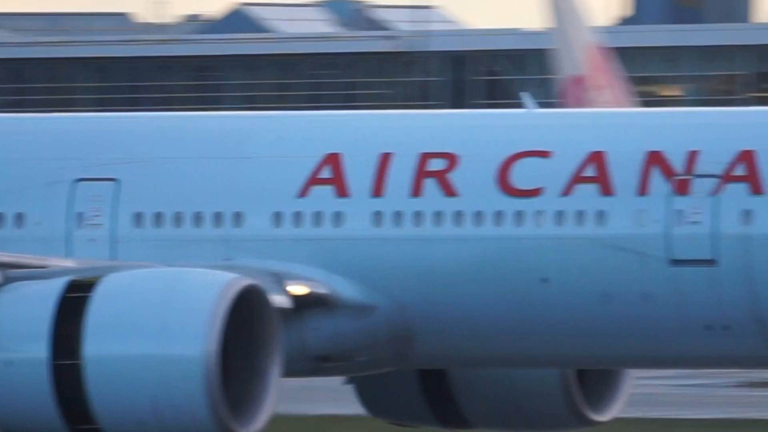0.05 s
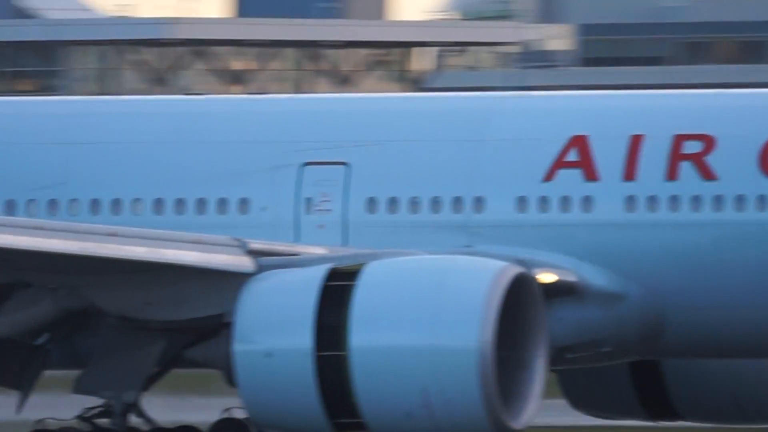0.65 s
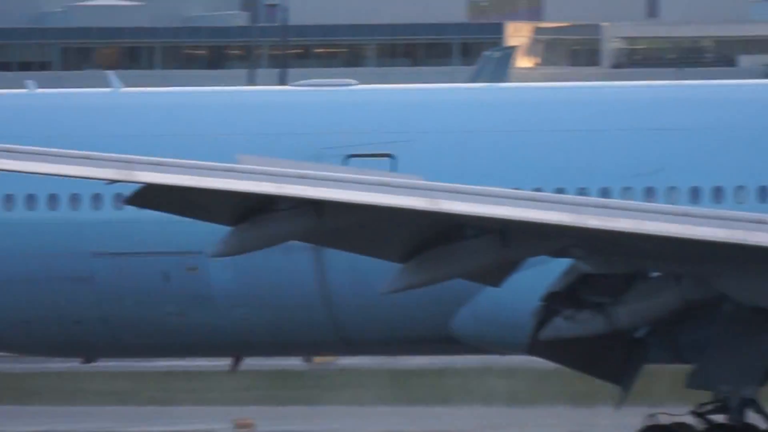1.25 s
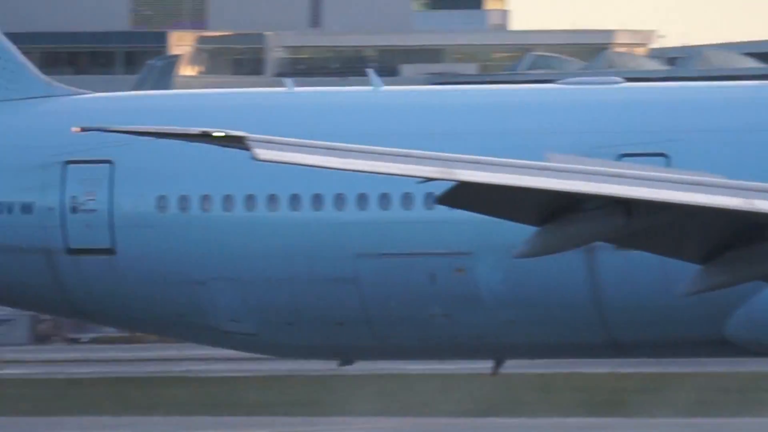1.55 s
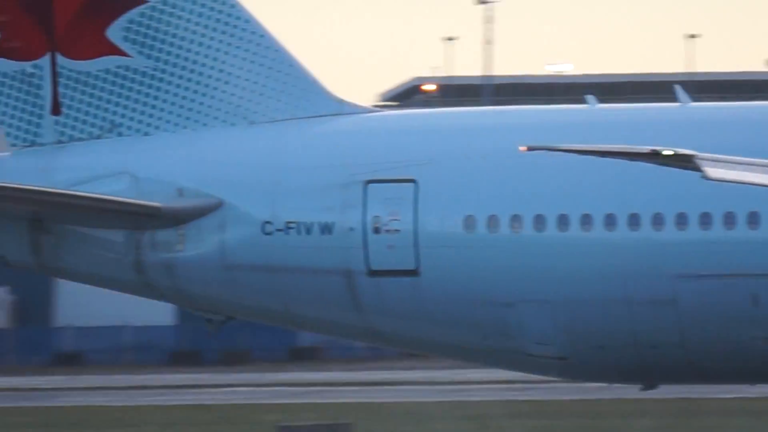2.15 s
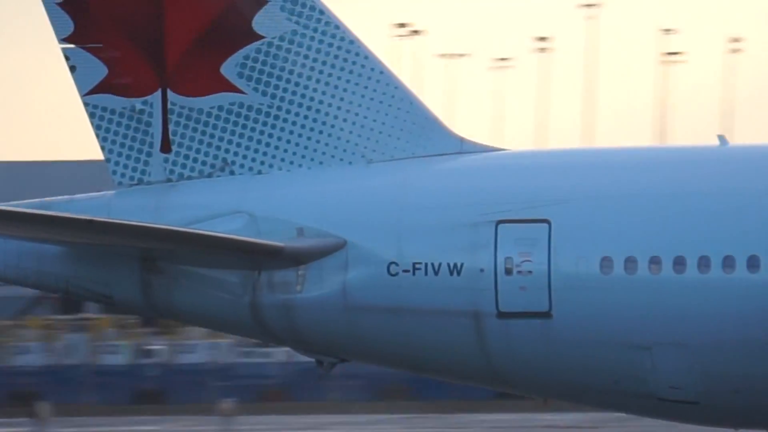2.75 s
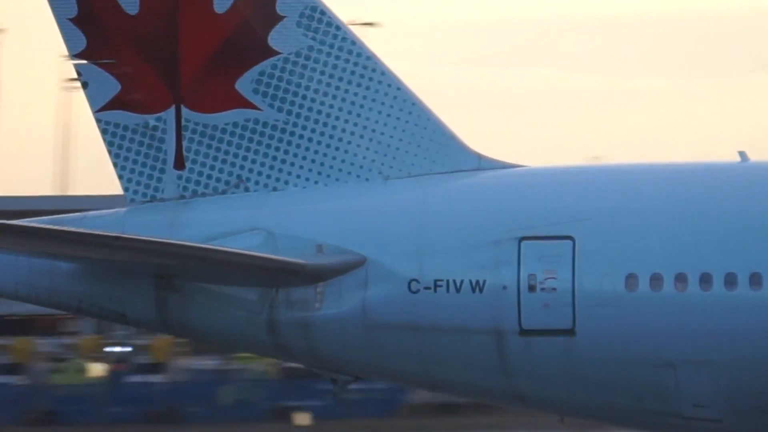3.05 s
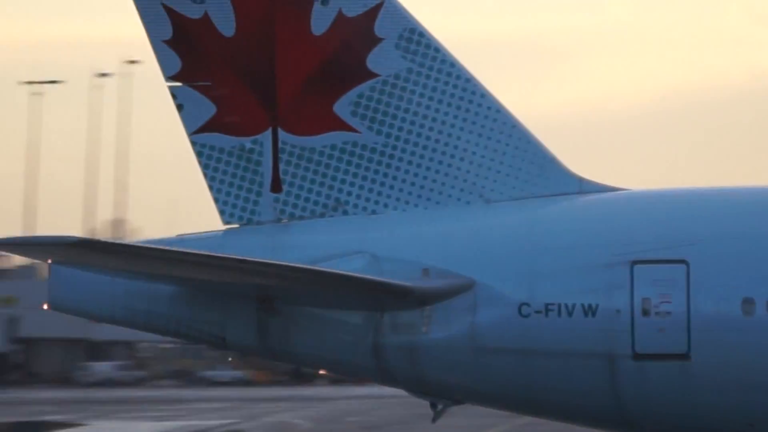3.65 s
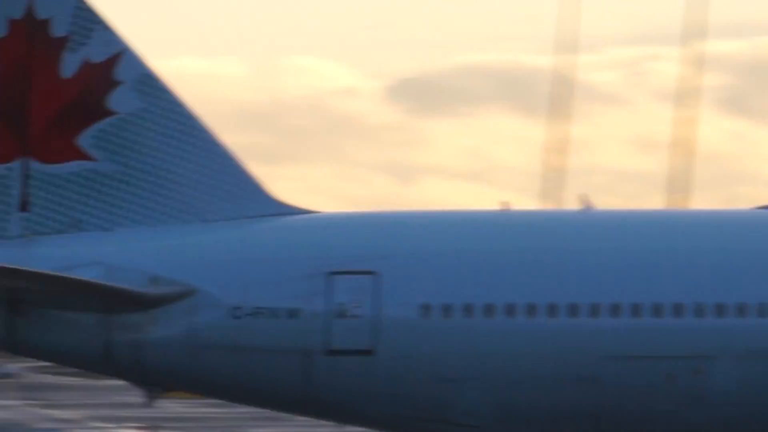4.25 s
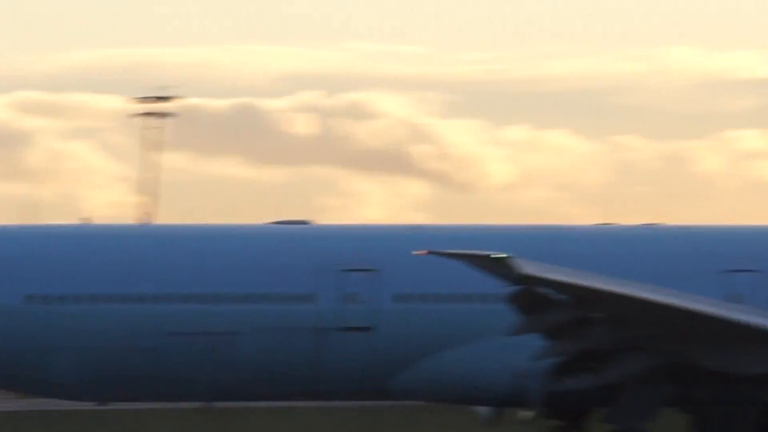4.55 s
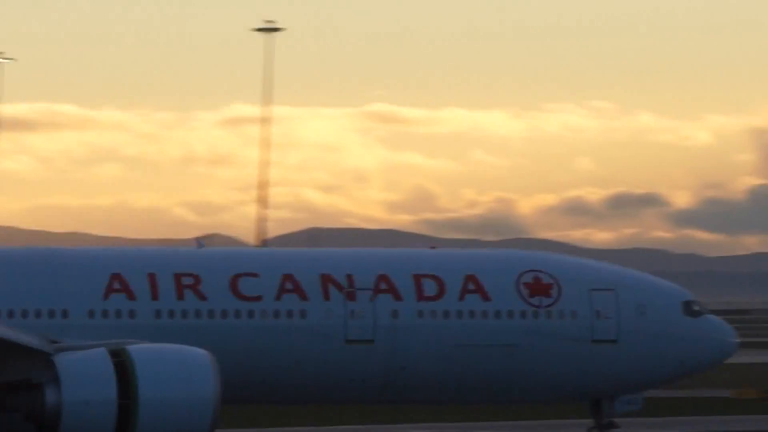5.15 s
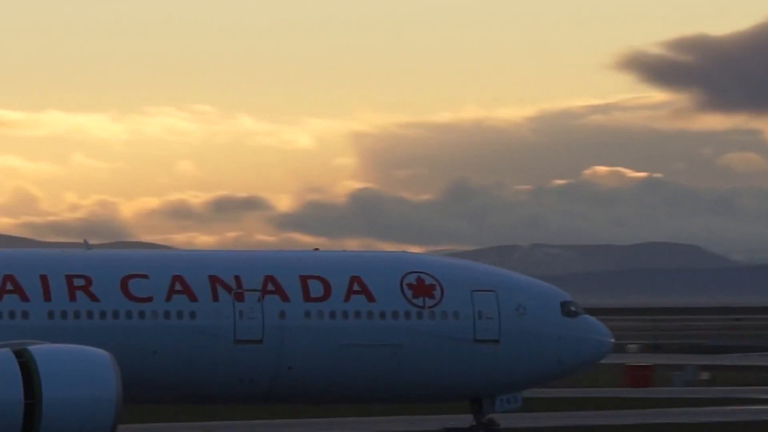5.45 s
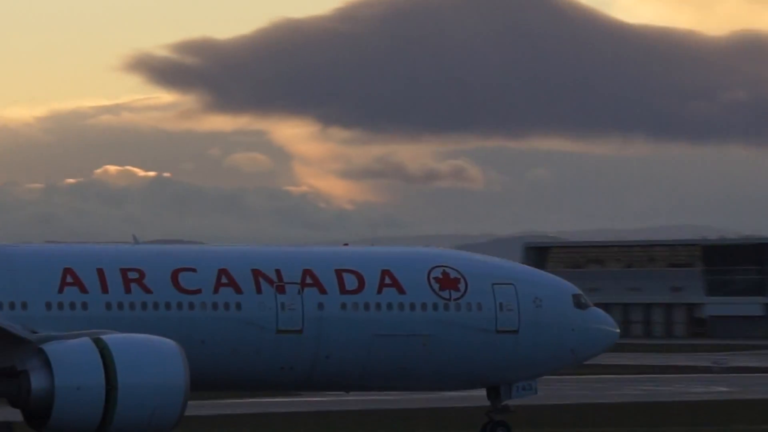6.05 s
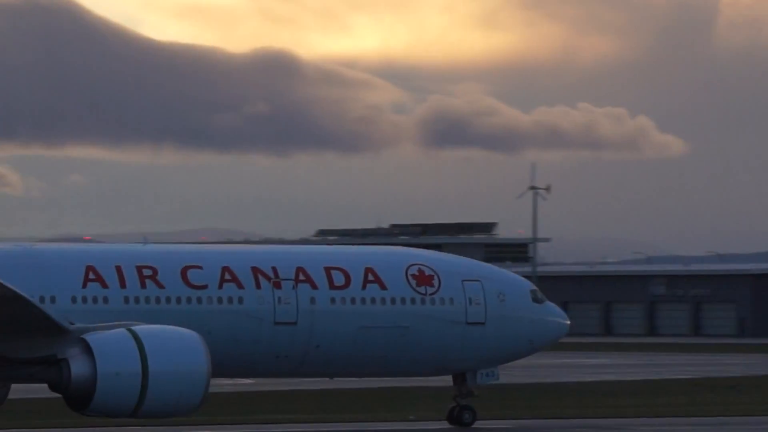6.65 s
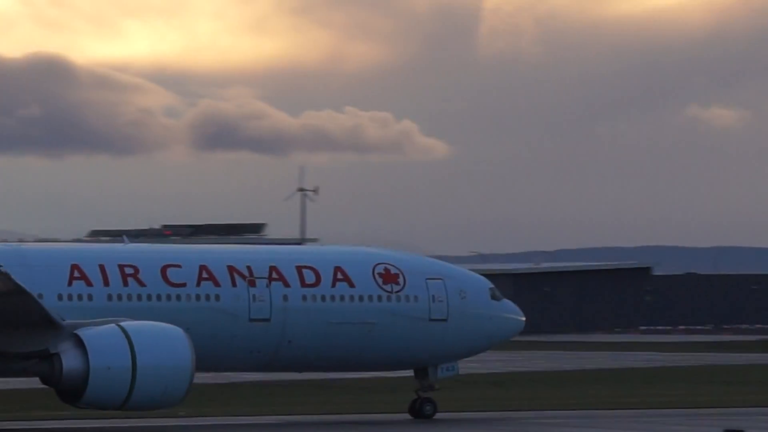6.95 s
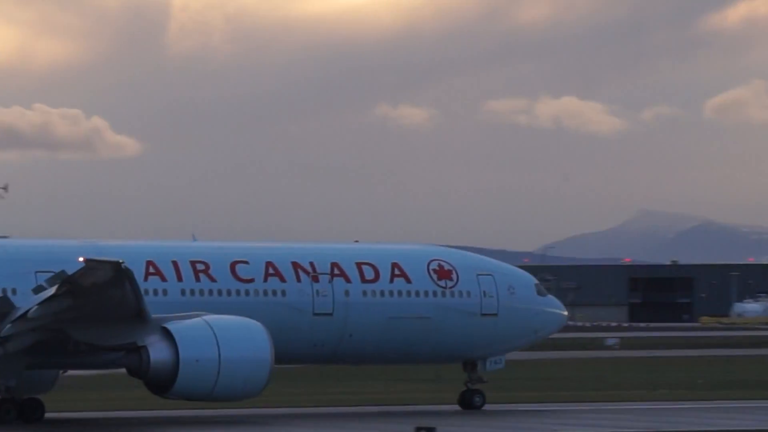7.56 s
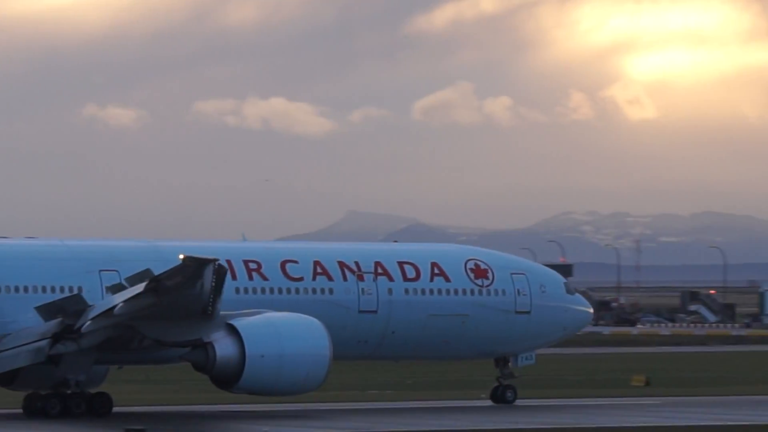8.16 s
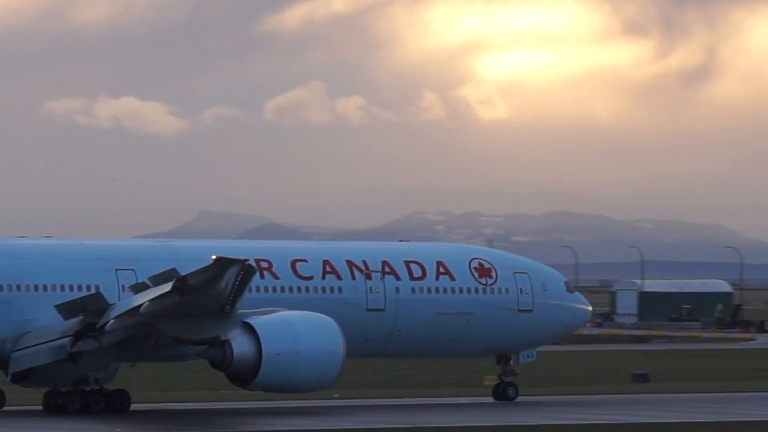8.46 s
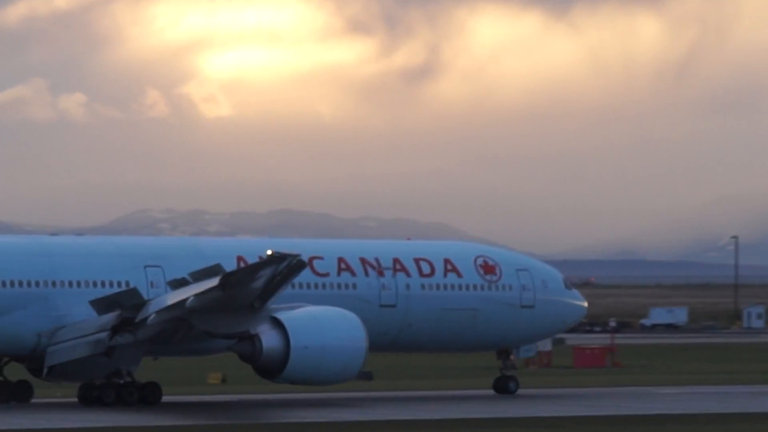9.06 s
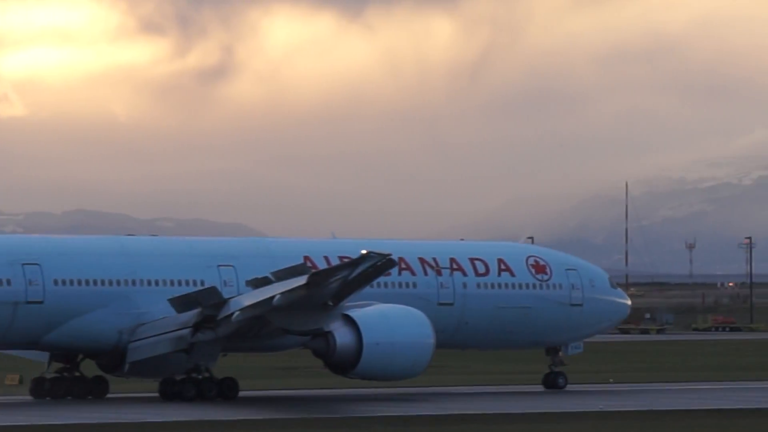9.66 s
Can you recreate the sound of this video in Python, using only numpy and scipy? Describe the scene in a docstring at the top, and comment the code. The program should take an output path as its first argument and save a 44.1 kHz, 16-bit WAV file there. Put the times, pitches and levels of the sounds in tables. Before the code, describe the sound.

A large jet airliner rolls past on an airport runway with a loud, continuous reverse-thrust roar. Faint fan tones fall in pitch as it passes, and the rushing noise wavers in the air. About four seconds in, a camera's zoom lever ticks close to the microphone and its motor hisses faintly. The roar then eases steadily as the engines wind down and the plane moves away.

```python
"""Jet rolling past in reverse thrust

A large jet passes on the runway, then recedes as its engines spool down and the reversers close.
Its mixing noise flutters in moving air; ground echoes carve notches that sink, then slowly rise.
Fan tones fall with Doppler shift and rotor speed, and flare briefly; the exhaust rasps once, late.
Midway, a camera's zoom lever ticks and its motor hisses faintly; a soft rustle follows near 6 s."""
import sys
import numpy as np
from scipy import signal
from scipy.fft import rfft, irfft, next_fast_len
from scipy.io import wavfile

SR = 44100
rng = np.random.default_rng(int(sys.argv[2]) if len(sys.argv) > 2 else 0)


def transcribe(u):
    """Save the signal u as a 16-bit wav file named by the first command-line argument.

    u: samples, shape (n,) or (channels, n), limited to [-1, 1]; the rate is SR.
    q: integer samples, one column per channel.
    """
    v = np.clip(np.atleast_2d(u).T, -1, 1)
    q = np.round(v * 32767).astype(np.int16)
    wavfile.write(sys.argv[1], SR, q)


N = 437472
SIZE, HOP = 2048, 256
HZ = np.fft.rfftfreq(SIZE, 1 / SR)
FRAME_S = np.arange(int(np.ceil(N / HOP)) + 1) * HOP / SR
SPOOL_DOWN_S = 5.7

# rumble, plume, roar, hiss: (low [Hz], high [Hz], starting level [dB], drift under power [dB/s],
# drift in spool-down [dB/s], step as the reversers close [dB])
JET_BANDS = [(40, 149, -53.5, -0.76, .5, -8), (199, 550, -28, -0.9, -3.5, 2.5),
             (596, 1990, -20.5, -0.1951, -3.5, -3.5), (2366, 4300, -32, 0.4974, -3.5, -3.5)]
# ground-echo ridges and notches behind the jet: (centre [Hz], width [Hz], gain [dB])
GROUND_ECHO = [(128, 13, -5.5), (176, 14, 3.5), (243, 19, -3), (390, 18, -2.5), (425, 24, 1.5),
               (520, 22, 2), (568, 32, -1), (810, 110, 1.1), (1083, 76, -2.5), (1292, 60, 3),
               (1440, 74, 3.5), (1723, 152, -8), (1967, 150, 3.6), (2272, 69, -6.5), (2700, 170, 5.5),
               (3000, 120, -1.5), (3420, 180, 4.5), (4000, 83, -5.5), (4600, 530, 0.5), (5130, 140, -5.5),
               (5600, 250, 0), (6150, 140, -11), (6500, 240, -2), (7070, 240, -8), (7600, 200, 2.5)]


def gain_of(db):
    """Decibels to amplitude."""
    return 10 ** (np.asarray(db) / 20)


def unit_rms(x):
    """Scale to rms 1."""
    return x / np.sqrt(np.mean(x ** 2) + 1e-20)


def ease(t, middle_s, half_s):
    """Smooth step from 0 to 1."""
    return .5 + .5 * np.tanh((t - middle_s) / half_s)


def per_bin(points):
    """Interpolate (frequency, value) points on a log-frequency axis."""
    hz, value = np.transpose(points)
    return np.interp(np.log(HZ + 1), np.log(hz + 1), value)


def per_frame(rows):
    """Interpolate each column of (time, values...) rows."""
    times_s, *columns = np.transpose(rows)
    return [np.interp(FRAME_S, times_s, column)[:, None] for column in columns]


def ridges(rows, shift=1):
    """Bell-shaped ridges and notches in dB, frequencies scaled by shift."""
    shape_db = sum(db * np.exp(-((HZ - hz) / width_hz) ** 2) for hz, width_hz, db in rows)
    return np.interp(HZ / shift, HZ, shape_db)


def noise_spectra():
    """Short-time spectra of white noise, frames x bins."""
    return signal.stft(rng.standard_normal(N), nperseg=SIZE, noverlap=SIZE - HOP)[2].T


def spooling_s(t):
    """Time since the engines were throttled back."""
    return np.maximum(t - SPOOL_DOWN_S, 0)


def doppler(t, speed_m_per_s=40.2, closest_s=1.84, distance_m=74.6, sound_m_per_s=343):
    """Pitch factor of a source passing in a straight line."""
    along_m = speed_m_per_s * (t - closest_s)
    return 1 / (1 + speed_m_per_s / sound_m_per_s * along_m / np.hypot(along_m, distance_m))


def band_levels_db(t):
    """Jet band levels: slow drift, spool-down, reversers closing; gusts sway the upper two."""
    # (time [s], length [s], roar gain [dB], hiss gain [dB])
    gusts = [(.52, 0.088, -1, -1.5), (0.77, 0.08, 1.5, -0.5), (0.958, .05, -2.5, 0.5),
             (1.45, 0.15, -1, 1.4), (2.367, 0.088, 0, 1), (2.788, 0.053, -1.5, -2.2),
             (3.15, 0.082, -1, 1.5), (3.5, 0.11, 0.5, 2), (4.19, 0.062, 0.5, 1), (4.5, 0.18, -1.5, -1.5),
             (5.0, 0.3, 0.3, 1), (5.545, 0.07, -2.5, -0.8), (5.86, 0.048, -1, -1.5), (6.113, 0.11, 0, 1.4),
             (6.4, .06, 2.5, 0.5), (6.637, 0.13, -3, 0), (6.86, 0.31, 1.2, 3.5), (7.416, 0.1, 3, 1),
             (7.8, 0.17, 0, -1), (8.15, 0.065, -3, -2.5), (8.36, 0.09, 0, 1.5), (8.89, 0.31, 0.3, 2.5),
             (9.013, 0.044, 4.5, -1), (9.13, 0.17, -2.5, -2), (9.412, 0.077, -1.2, 3),
             (9.75, 0.23, -0.5, -1)]
    stowed = ease(t, middle_s=7.18, half_s=.32)
    rumble, plume, roar, hiss = (
        db + drift * np.minimum(t, SPOOL_DOWN_S) + spool_drift * spooling_s(t) + step_db * stowed
        for _, _, db, drift, spool_drift, step_db in JET_BANDS)
    for at_s, length_s, roar_db, hiss_db in gusts:
        bell = np.exp(-((t - at_s) / length_s) ** 2)
        roar, hiss = roar + roar_db * bell, hiss + hiss_db * bell
    return rumble, plume, roar, hiss


def levelled(colour_db, targets_db):
    """Bend a spectrum smoothly toward a target level in each jet band."""
    power = gain_of(colour_db) ** 2 / len(HZ)
    centres_hz = [np.sqrt(low * high) for low, high, *_ in JET_BANDS]
    for (low, high, *_), target_db, share in zip(JET_BANDS, targets_db, np.eye(len(JET_BANDS))):
        band_db = 10 * np.log10(power[:, (HZ >= low) & (HZ < high)].sum(1, keepdims=True))
        colour_db = colour_db + (target_db - band_db) * per_bin(list(zip(centres_hz, share)))
    return colour_db


def directivity_db(t, turn_away_s=0.93, step_s=4.36):
    """Jet colour as the angle of view moves from abeam to behind to far off."""
    # spectrum at each view: (frequency [Hz], relative density [dB])
    abeam = [(20, -71.5), (42, -44.5), (78, -19.5), (125, -33), (200, -18), (290, -9.5), (430, -2),
             (1050, -4), (1900, -10), (2900, -14.5), (3500, -17.5), (5000, -30.5), (6500, -47),
             (7600, -67.5), (9000, -80)]
    behind = [(20, -63.5), (42, -41.5), (75, -24), (115, -24), (155, -14.5), (205, -18), (270, -6),
              (400, -0.5), (1100, 1), (2600, -11.5), (3700, -18.5), (5300, -24.5), (6500, -36), (8000, -53),
              (9500, -76.5)]
    far = [(20, -57), (42, -40.5), (90, -19.5), (132, -23), (200, -10), (310, -2), (450, -3.5), (750, -1.5),
           (1450, -4.5), (2700, -12), (4800, -21), (6400, -35), (7300, -53), (9000, -75)]
    view = np.clip((t - turn_away_s) / step_s, 0, 2)
    return sum(np.maximum(1 - abs(view - k), 0) * per_bin(colour)
               for k, colour in enumerate([abeam, behind, far]))


def ripple_db(t, fan_doppler_share=0.44, early_echo=0.08):
    """Fan bands and near reflections abeam; behind the jet the grazing ground echo takes over."""
    # at closest approach: (centre [Hz], width [Hz], gain [dB])
    fan_bands = [(421, 38, 0), (475, 28, 0), (890, 85, 1), (1034, 51, 2), (1230, 110, -4), (1555, 120, 3),
                 (1805, 263, -3), (2870, 130, 5), (3630, 85, 0.5), (4280, 110, 3.5)]
    roar_hollow = [(643, 75, -3.5)]
    reflections = [(126, 16, -2), (3290, 150, -5.5), (3750, 92, 0.5), (4020, 130, -3.5), (5330, 110, -1.5),
                   (5700, 150, 2.5), (6030, 130, 0.5), (6570, 220, 1), (6980, 140, -3.5), (7330, 150, 4)]
    # echo notches sink, then climb as the path flattens: (time [s], frequency factor)
    notch_slide = [(4.7, 0.97), (5.5, 0.97), (6.4, 0.95), (7.5, 0.974), (9.92, 1.003)]
    echo = early_echo + (1 - early_echo) * ease(t, middle_s=4.84, half_s=0.76)
    fan_db = ridges(fan_bands, doppler(t) ** fan_doppler_share) + ridges(roar_hollow, doppler(t))
    ground_db = ridges(GROUND_ECHO, per_frame(notch_slide)[0])
    near_db = (1 - ease(t, middle_s=4.52, half_s=.12)) * ridges(reflections)
    return (1 - echo) * fan_db + echo * ground_db + near_db


def eddies(length_s, width_hz):
    """Moving air: a smooth random time-frequency field of rms 1."""
    white = np.fft.rfft2(rng.standard_normal((len(FRAME_S), 128)))
    rate_hz = np.fft.fftfreq(len(FRAME_S), HOP / SR)[:, None]
    cycles_per_hz = np.fft.rfftfreq(128, HZ[8])
    field = np.fft.irfft2(white / (1 + (rate_hz * length_s) ** 2) / (1 + (cycles_per_hz * width_hz) ** 2))
    return unit_rms(np.repeat(field, 9, axis=1)[:, :len(HZ)])


def port_noise():
    """Turbulent noise at two microphone ports that turn after the jet."""
    # (time [s], turn [0 abeam, 1 aft], extra L-R [dB])
    pan = [(0, .13, 1.8), (1.3, 0.064, 0.6), (3.8, 0.27, -1), (4.25, 0.23, -0.5), (5.2, 0.95, 0.4),
           (9.92, 0.89, 0)]
    # (frequency [Hz], L-R [dB])
    abeam_balance = [(100, 0.5), (550, -1), (950, 1.5), (1230, -5.5), (1580, 6.5), (1850, -5.5), (2150, 5),
                     (2500, -6.5), (2900, -2.5), (3250, -4.5), (3700, -2), (4400, 1), (6600, 1.5),
                     (7000, -3)]
    aft_balance = [(100, 1), (900, 0.7), (1250, -0.1), (1700, 5.5), (1900, 0.5), (2150, 5), (2550, -1),
                   (2850, -6), (3150, 1.5), (3450, -2.3), (4200, 3.5), (5500, 1.5), (6400, 6.5),
                   (7500, 0.5)]
    # (frequency [Hz], left lead [rad])
    abeam_phase = [(60, -0.093), (300, 0.023), (700, 0.55), (1100, -0.04), (1400, 1.1), (1700, -0.26),
                   (1950, 0.98), (2350, -1.5), (2650, -0.01), (3120, -1.3), (3350, 1.4), (3800, 0.44),
                   (4300, -0.8), (5600, 0.31)]
    aft_phase = [(60, 0.02), (300, 0.14), (750, 0.31), (1100, 0.39), (1500, 0.7), (1950, 0.64),
                 (2200, -0.24), (2700, 0.26), (3000, 1.03), (3250, 0.8), (3650, 0.91), (4800, 0.49),
                 (5400, 0.57), (7000, 0.15)]
    # (frequency [Hz], coherence [0-1])
    coherence = [(100, 1), (500, 0.98), (1000, 0.98), (2000, 0.97), (4000, 0.91), (6500, 0.86),
                 (10000, .75)]
    turn, pan_db = per_frame(pan)
    balance_db = pan_db + (1 - turn) * per_bin(abeam_balance) + turn * per_bin(aft_balance)
    phase_rad = (1 - turn) * per_bin(abeam_phase) + turn * per_bin(aft_phase)
    lean = gain_of(balance_db / 2) * np.exp(.5j * phase_rad)
    mid = noise_spectra() * np.sqrt((1 + per_bin(coherence)) / 2)
    side = noise_spectra() * np.sqrt((1 - per_bin(coherence)) / 2)
    return np.array([(mid + side) * lean, (mid - side) / lean])


def howls_db():
    """Bands of the roar swell or sink: gliding bells in time and frequency."""
    # (time [s], length [s], centre [Hz], glide [Hz/s], width [Hz], gain [dB])
    swells = [(.5, .9, 76, -1, 10, 6.5), (0.858, 0.045, 2930, 0, 130, 5), (1.35, .25, 2790, 1.5, 70, 2),
              (2.3, 0.22, 1492, 1, 70, 3), (2.454, 0.34, 1125, -37, 45, 4.5), (3.15, .064, 3050, 2, 130, 3),
              (3.5, 0.37, 3000, -130, 70, 5), (3.85, .15, 419, -1, 55, 5), (4.9, .25, 58, -4, 18, 8.5),
              (4.9, 0.89, 378, 0, 19, 6), (5.4, 0.19, 904, -1, 75, 5), (5.9, .7, 820, -5, 30, 2),
              (6.2, .4, 416, 1, 18, 3), (6.817, 0.11, 2430, -3, 160, 2.5), (7.5, 0.14, 640, -2, 59, 5.5),
              (8.65, .15, 370, -3, 25, 7.5), (8.7, 1.7, 312, -15, 18, 5), (9.1, .8, 1235, -9.5, 26, 7),
              (8.9, 0.074, 710, 0, 50, 6.5), (9.803, 0.17, 695, 0, 87, 7.5), (.3, .2, 4450, -100, 130, 3),
              (4.5, .35, 455, 0, 40, -2), (7.8, .3, 335, 0, 40, 2.5), (2.85, .3, 205, 0, 25, -3.5),
              (3.55, .25, 228, 0, 30, 2.5), (4.05, .25, 310, 0, 25, 2.5), (4.55, .4, 141, 0, 25, -2.5),
              (5.35, .25, 1300, -60, 110, 2), (6.0, .13, 2700, 0, 450, 1), (6.9, .18, 400, 0, 40, -4),
              (7.2, .5, 145, 0, 33, -4.5), (7.4, .45, 7000, 0, 1200, 3), (7.5, .25, 2180, 1, 120, -6),
              (8.62, .1, 3660, -1, 170, 4), (8.68, .07, 5800, 0, 900, 2), (8.7, .35, 835, 40, 62, -3),
              (9.0, .4, 1090, -150, 76, 3.5), (9.6, .33, 6100, 0, 1000, -4), (9.72, .2, 1720, 0, 70, 5.5),
              (9.7, .35, 3280, 0, 130, -5)]
    out = np.zeros((len(FRAME_S), len(HZ)))
    for at_s, length_s, hz, glide, width_hz, db in swells:
        near = abs(FRAME_S - at_s) < 3 * length_s
        t = FRAME_S[near, None] - at_s
        detuning = (HZ - hz - glide * t) / width_hz
        out[near] += db * np.exp(-(t / length_s) ** 2 - np.minimum(detuning ** 2, 20))
    return out


def aft_lobe_db(t, at_s=3.44, length_s=1.5, centre_hz=214, width_oct=0.98, peak_db=3.0):
    """The plumes beam low roar aft; the lobe sweeps by, rippled by reflections."""
    # (centre before shift [Hz], width [Hz], gain [dB])
    reflections = [(72, 22, -1.5), (140, 35, 2), (190, 20, -6.5), (262, 18, 4), (328, 16, 3),
                   (590, 36, -1.5), (820, 75, 1)]
    lobe_db = peak_db * np.exp(-(np.log2((HZ + 1) / centre_hz) / width_oct) ** 2)
    return np.exp(-((t - at_s) / length_s) ** 2) * (lobe_db + ridges(reflections, shift=0.99))


def jet(broad_flutter_db=0.5, patchy_flutter_db=1.0, air_db_per_s_at_5khz=0.14):
    """Spectra of jet mixing noise; the air flutters and absorbs short waves most."""
    t = FRAME_S[:, None]
    colour_db = levelled(directivity_db(t) + ripple_db(t), band_levels_db(t))
    flutter_db = broad_flutter_db * eddies(length_s=0.045, width_hz=7200)
    flutter_db += patchy_flutter_db * eddies(length_s=0.13, width_hz=540)
    flutter_db *= np.sqrt(HZ / (HZ + 700))
    air_loss_db = air_db_per_s_at_5khz * spooling_s(t) * (HZ / 5000) ** 2
    return port_noise() * gain_of(colour_db + aft_lobe_db(t) + howls_db() - air_loss_db + flutter_db)


def fuzzy_tone(hz, width_hz, roughness=0.4):
    """Tone of rms 1 on a pitch curve, wavering in turbulent air; roughness 0 holds its level steady."""
    offset_hz = np.fft.fftfreq(next_fast_len(len(hz)), 1 / SR)
    spread = rng.standard_normal(len(offset_hz)) + 1j * rng.standard_normal(len(offset_hz))
    waver = np.fft.ifft(spread * np.exp(-(offset_hz / width_hz) ** 2))[:len(hz)]
    phase_rad = np.angle(waver) + 2 * np.pi * np.cumsum(hz) / SR
    return unit_rms(abs(waver) ** roughness * np.cos(phase_rad))


def rotor_tones(slowing_per_s=.045, unmask_db_per_s=0.5):
    """Blades chop intake air: forward-beamed tones that sink as the jet passes and the rotors slow."""
    # (pitch at closest approach [Hz], width [Hz], Doppler share, level ahead [dB re roar],
    # beam lost [s], level behind [dB re roar])
    rotors = [(589, 14, .6, -14.5, 1.5, -25), (470.4, 14, 1, -19.5, 1.9, -20),
              (1089, 36, .58, -10, 2.9, -43), (1554, 27, 1, -22.5, 2.7, -25)]
    t, out = np.arange(N) / SR, np.zeros(N)
    _, _, roar_db, _ = band_levels_db(FRAME_S)
    reference_db = roar_db + unmask_db_per_s * spooling_s(FRAME_S)
    rotor_speed = np.exp(-slowing_per_s * spooling_s(t))
    for closest_hz, width_hz, doppler_share, ahead_db, lost_s, behind_db in rotors:
        beam_db = ahead_db + (behind_db - ahead_db) * ease(FRAME_S, lost_s, half_s=0.2)
        hz = closest_hz * doppler(t) ** doppler_share * rotor_speed
        out += gain_of(np.interp(t, FRAME_S, reference_db + beam_db)) * fuzzy_tone(hz, width_hz)
    return out


def whines():
    """Thin, gliding fan and turbine tones flare briefly out of the roar."""
    # (time [s], length [s], pitch [Hz], glide [Hz/s], width [Hz], level [dB])
    flares = [(0.238, .04, 3010, -1, 40, -41), (.43, .07, 2995, -100, 35, -37),
              (.79, .07, 1122, -40, 18, -33), (.855, .075, 2950, -100, 34, -32.5),
              (.86, .16, 1490, -220, 25, -36), (1.16, .12, 496, -19.5, 9, -32),
              (1.47, 0.065, 442, 0, 10, -32), (1.88, .17, 428, -80, 9, -33),
              (1.584, .12, 2270, 0.5, 30, -39), (2.27, .08, 1450, 0, 15, -33),
              (2.41, .11, 1490, -30, 11, -31), (3.14, .06, 2820, -0.5, 90, -35),
              (3.5, .09, 2700, -0.5, 45, -38), (5.572, 0.045, 1265, -0.5, 16, -29),
              (6.047, 0.18, 1264, -40, 26, -37), (6.35, 0.23, 417.7, 0, 10, -36.5),
              (6.442, .13, 1250, -29.5, 25, -35), (6.748, .05, 1995, 0, 25, -36),
              (6.98, .09, 1980, -60, 20, -40), (7.47, 0.27, 1926, -80, 14, -39.5),
              (7.82, .14, 1225, -0.5, 10, -45), (8.38, .15, 456, 0, 8.7, -40.5),
              (8.85, 0.25, 1496, -24.5, 18, -47), (9.48, .08, 1455, -39.5, 14, -47)]
    out = np.zeros(N + 2 * SR)  # 1 s margin at each end
    t = np.arange(SR) / SR - .5
    for at_s, length_s, hz, glide, width_hz, db in flares:
        envelope = gain_of(db) * np.exp(-(t / length_s) ** 2)
        out[round((at_s + .5) * SR):][:SR] += envelope * fuzzy_tone(hz + glide * t, width_hz)
    return out[SR:SR + N]


def hiss_and_rustle(mid_gain=0.81, side_gain=.45):
    """Spectra of zoom-motor hiss, then a soft rustle near 6 s, over faint microphone self-noise."""
    # (time [s], level [dB])
    motor_then_rustle_level = [(3.2, -100), (3.6, -79), (4.0, -78.5), (4.25, -69), (4.31, -64), (4.5, -61),
                               (4.62, -62.5), (4.68, -70), (4.95, -78), (5.2, -94), (5.95, -88),
                               (6.09, -75), (6.15, -84), (6.4, -82), (6.6, -95)]
    self_noise_level = [(0, -84.5), (3, -80), (7, -76.5), (9.92, -75.5)]
    # (frequency [Hz], relative density [dB])
    treble_colour = [(3000, -17.5), (7000, 2.5), (9500, 1.5), (11000, -5.5), (15000, -7)]
    treble = gain_of(per_frame(motor_then_rustle_level)[0]) * unit_rms(gain_of(per_bin(treble_colour)))
    self_noise = gain_of(per_frame(self_noise_level)[0])
    mid, side = noise_spectra() * mid_gain, noise_spectra() * side_gain
    return np.array([mid + side, mid - side]) * np.hypot(treble, self_noise)


def zoom_lever(right_db=-2, snap_s=0.00072, snap_gain=.35):
    """Plastic ticks carried through the camera body: a snap plus ringing modes; the last, faint one opens the
    soft rustle near 6 s."""
    # (time [s], left peak [dB]); the last row is the faint tick that opens the rustle
    ticks = [(4.1137, -22), (4.1205, -45), (4.309, -36), (6.085, -50)]
    # (frequency [Hz], relative level [dB], t60 [s])
    lever_modes = [(6800, -1, 0.013), (7260, 2, 0.0076), (9400, -5, 0.0082), (10500, -8, 0.0064),
                   (12300, -16, .006), (14700, -16, 0.0055)]
    t, out = np.arange(2048) / SR, np.zeros(N)
    ring = sum(gain_of(db - 60 * t / t60) * np.sin(2 * np.pi * hz * t) for hz, db, t60 in lever_modes)
    snap = rng.standard_normal(len(t)) * np.exp(-t / snap_s)
    tick = ring + snap_gain * np.diff(snap, prepend=0)
    for at_s, db in ticks:
        out[round(at_s * SR):][:len(t)] += gain_of(db) * tick / abs(tick).max()
    return np.array([out, out * gain_of(right_db)])


def exhaust_rasp(at_s=8.317, length_s=.014, centre_hz=2400, width_hz=850, level_db=-34):
    """Short burst of exhaust noise, coloured by the ground echo."""
    hz = np.fft.rfftfreq(N, 1 / SR)
    band = np.exp(-((hz - centre_hz) / width_hz) ** 2)
    echo = gain_of(np.interp(hz, HZ, ridges(GROUND_ECHO)))
    burst = unit_rms(irfft(rfft(rng.standard_normal(N)) * band * echo, N))
    envelope = np.exp(-((np.arange(N) / SR - at_s) / length_s) ** 2)
    return gain_of(level_db) * burst * envelope


def scene():
    """Stereo mix of the jet, its tones and the small sounds close by."""
    spectra = np.swapaxes(jet() + hiss_and_rustle(), 1, 2)
    noise_layers = signal.istft(spectra, nperseg=SIZE, noverlap=SIZE - HOP)[1][:, :N]
    return noise_layers + rotor_tones() + whines() + exhaust_rasp() + zoom_lever()


def record(dry):
    """Low-pass at 15.8 kHz."""
    taps = signal.firwin(511, 15800, window=("kaiser", 9), fs=SR)
    return signal.oaconvolve(dry, taps[None], "same")


dry = scene()
out = record(dry)
transcribe(out)
```